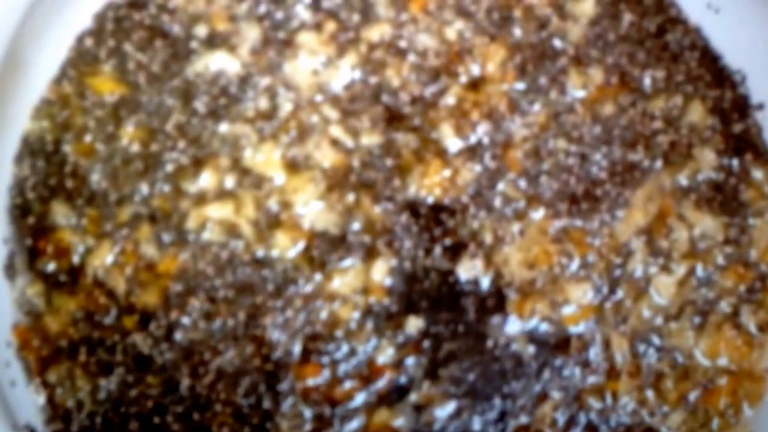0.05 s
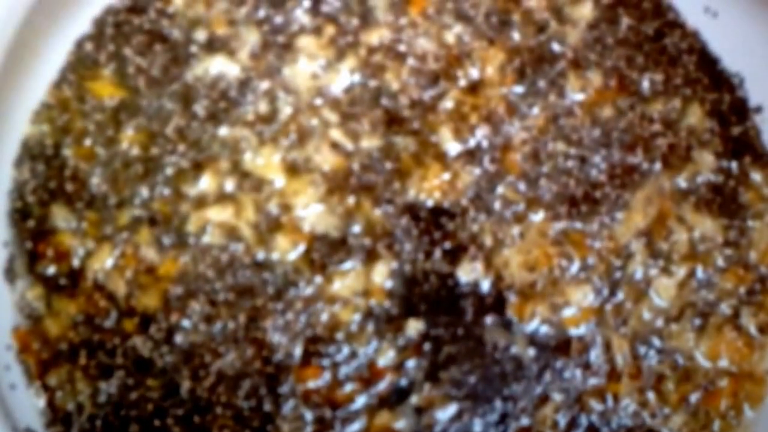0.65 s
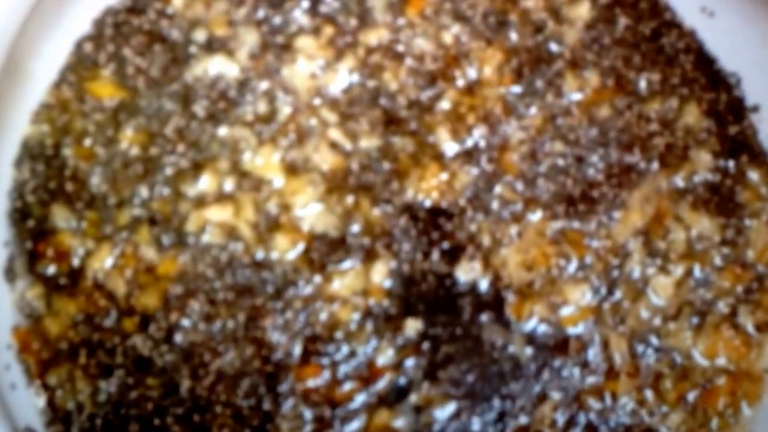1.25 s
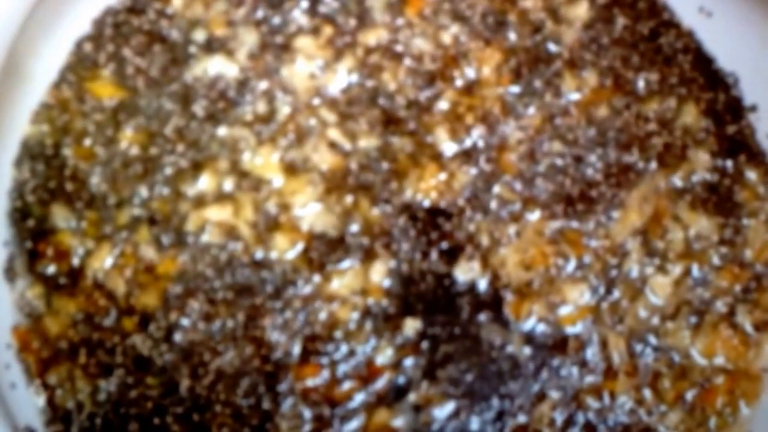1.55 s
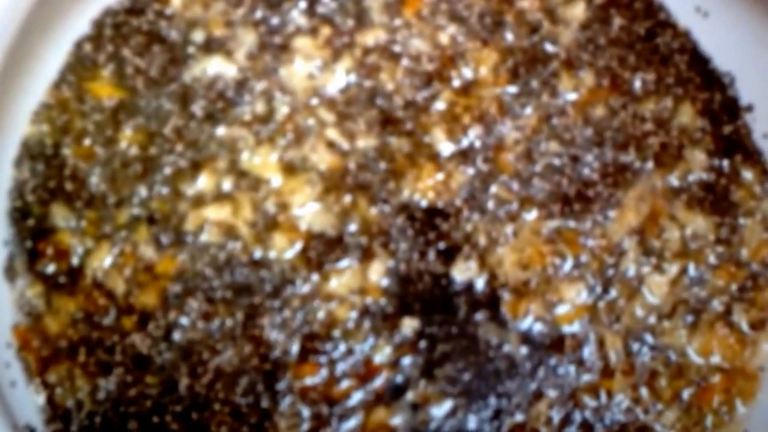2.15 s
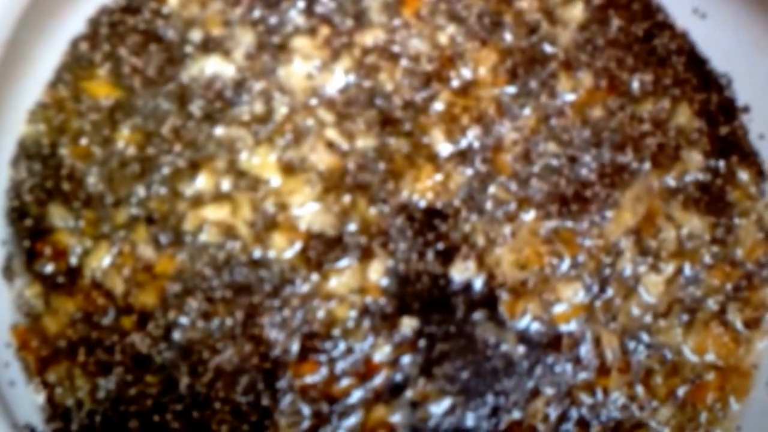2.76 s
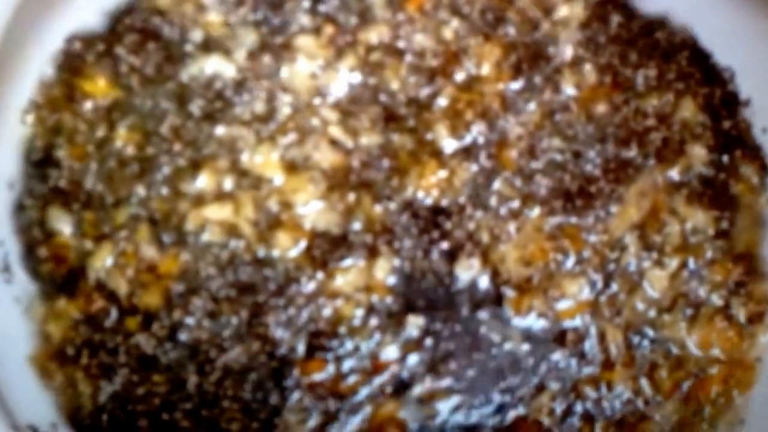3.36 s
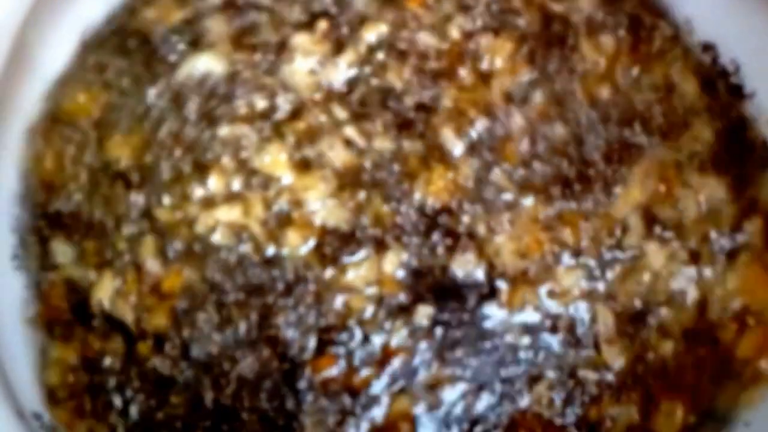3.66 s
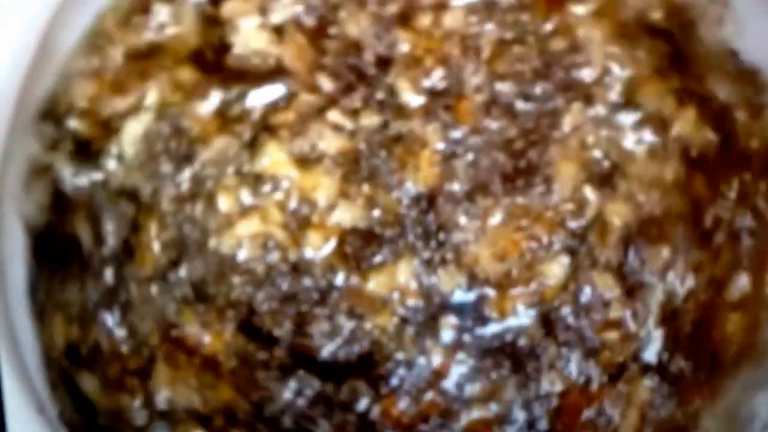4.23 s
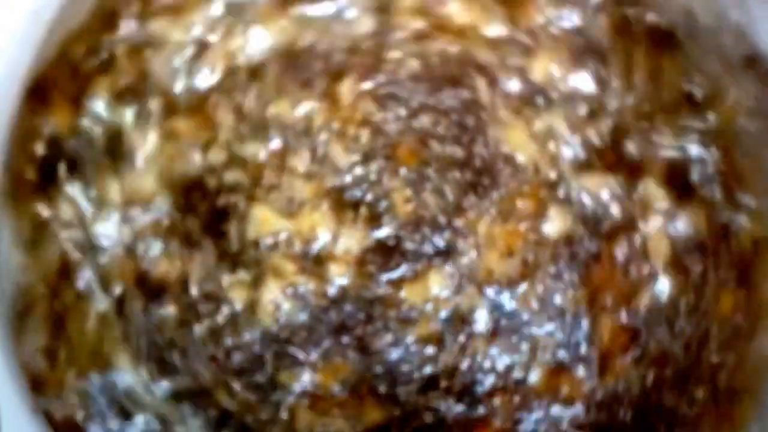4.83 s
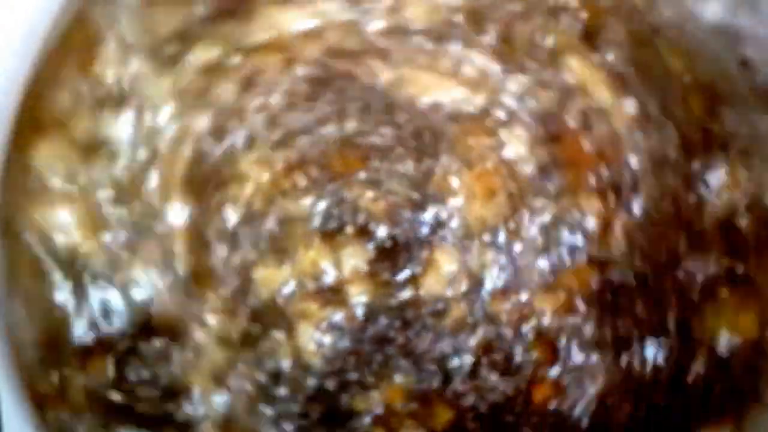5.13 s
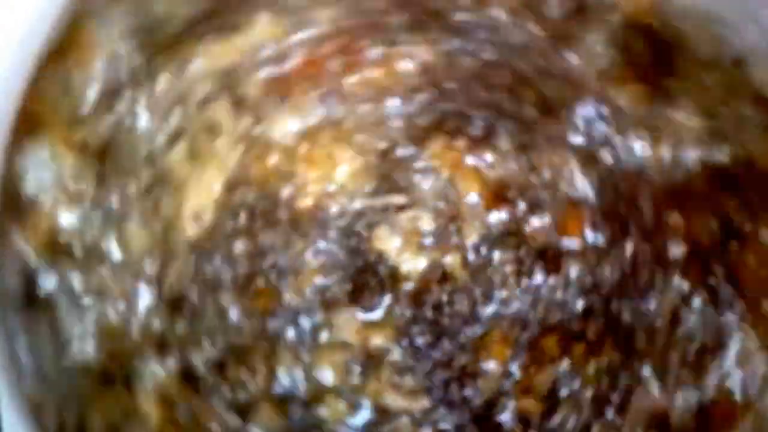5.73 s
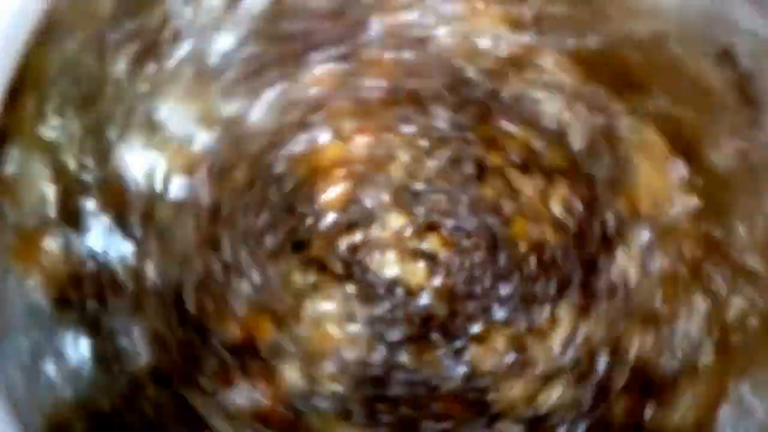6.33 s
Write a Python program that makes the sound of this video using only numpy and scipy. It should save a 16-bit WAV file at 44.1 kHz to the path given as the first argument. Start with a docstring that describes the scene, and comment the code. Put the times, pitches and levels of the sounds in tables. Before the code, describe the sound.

A toilet lever rattles over a faint hiss, then the flush rushes in with fizzing spray, spurts, squelches and gurgling.

```python
"""A toilet flushing, full of food scraps: small tiled bathroom, one microphone just above the bowl.
The jet spits air, catches and rushes in as fine drops and fizz. Air trapped under the swirling scraps
escapes in spurts and sagging squelches; the water slops and gurgles below, and the flow blows hollow
notes from the pipes. Before the water comes, the lever rattles and knocks over a faint hiss and hum."""
import sys
import numpy as np
from scipy import signal
from scipy.fft import rfft, irfft, next_fast_len
from scipy.io import wavfile

SR = 44100
rng = np.random.default_rng(int(sys.argv[2]) if len(sys.argv) > 2 else 0)


def master(y):
    """Save y as 16-bit WAV."""
    cut = np.clip(np.atleast_2d(y).T, -1, 1)
    pcm = np.round(cut * 32767)  # scale
    wavfile.write(sys.argv[1], SR, pcm.astype(np.int16))


N = 286120
TIME = np.arange(N) / SR
FREQS = np.fft.rfftfreq(N, 1 / SR)

# The jet just below the microphone, still spitting air: time_s, level_db
JET_SPITTING = [(2.52, -59), (2.55, -45.5), (2.594, -44.5), (2.648, -27.5), (2.858, -35), (2.862, -29),
                (2.96, -41.5), (3.15, -39.5)]
# The jet once it runs full: time_s, level_db
JET_RUSHING = [(3.3, -23.5), (3.34, -24.5), (3.87, -24.5), (4.0, -26), (4.58, -30.5), (4.79, -31),
               (5.83, -30), (6.17, -26), (6.48, -28)]
# Tone of the spray at close range: frequency_hz, level_db
SPRAY_SPECTRUM = [(100, -75), (1200, -27), (2600, -12.5), (3800, -1.5), (5600, -3), (7000, 1), (10300, 2),
                  (11300, 0.5), (12000, -17), (13000, -12.5), (15000, -27)]
def jet_spray(catch_s=3.154):
    """The jet breaks into fine drops and fizz; it jumps to full flow as it catches."""
    patter = drops(per_s=5000, spread_db=0)
    fizz = amp(-6) * bubbles(2953, 11750, per_s=2200, cycles=11.3, spread_db=-0.5)
    flow_db = np.where(TIME < catch_s, follow(JET_SPITTING), follow(JET_RUSHING))
    spray = colour(patter + fizz, SPRAY_SPECTRUM)
    return amp(flow_db + 9) * spray * surges(per_s=51, fall_s=0.011, depth=0.51)


# Water churning as the bowl fills: time_s, level_db
CHURN_FILLING = [(2.52, -91), (2.578, -53.5), (2.724, -39), (3.15, -40)]
# Water churning as it swirls and drains: time_s, level_db
CHURN_SWIRLING = [(3.16, -31.5), (3.37, -38), (3.95, -36.5), (4.42, -42), (4.86, -44.5), (5.17, -41),
                  (6.28, -37.5), (6.48, -37.5)]
# Waves slopping over in the bowl: start_s, length_s, splash_db, gurgle_db
WAVES = [(2.687, 0.042, -21, -53), (2.756, 0.1, -33, -35.5), (2.892, 0.15, -37, -34),
         (3.161, 0.074, -23.5, -34.5), (3.202, 0.053, -17, -41), (3.313, 0.12, -17.5, -37),
         (3.487, 0.1, -19.5, -46), (3.571, 0.13, -23, -36), (3.714, 0.11, -39, -41),
         (3.853, .05, -29, -33.5), (3.93, 0.086, -30, -34), (4.281, 0.055, -36, -35.5),
         (5.058, 0.11, -38, -39.5)]
def churn(steady_db, wave_column):
    """Gain of the moving water: steady churning plus one column of the slopping waves."""
    power = amp(follow(CHURN_FILLING + CHURN_SWIRLING) + steady_db) ** 2
    for wave in WAVES:
        start, length = wave[:2]
        power += (amp(wave[wave_column]) * swell(TIME - start, length, rise_s=0.016, fall_s=0.028)) ** 2
    return np.sqrt(power)


# Tone of the splashes, from above the water: frequency_hz, level_db
SPLASH_SPECTRUM = [(100, -61), (700, -19), (1300, -16), (1700, -6.5), (2300, 0), (3200, -3), (4500, 0),
                   (7000, -7.5), (12000, -35)]
def splash():
    """Water slaps the scraps and the wall of the bowl."""
    slaps = drops(per_s=2500, spread_db=2)
    froth = amp(-6) * bubbles(1192, 5870, per_s=900, cycles=11.4, spread_db=3.5)
    return churn(steady_db=12.5, wave_column=2) * colour(slaps + froth, SPLASH_SPECTRUM)


# Tone of the gurgle down in the bowl: frequency_hz, level_db
GURGLE_SPECTRUM = [(60, -52), (150, -21), (230, -15), (350, -9), (520, 0.5), (720, 3), (900, 1),
                   (1200, -15.5), (1800, -14), (4000, -55)]
def gurgle():
    """Large bubbles churn in the water."""
    glugs = bubbles(225.7, 1410, per_s=800, cycles=8.2, spread_db=0)
    wash = amp(1.5) * rng.standard_normal(N)
    return churn(steady_db=-2, wave_column=3) * colour(glugs + wash, GURGLE_SPECTRUM)


# Air pockets squeezed from under the scraps, close up: start_s, length_s, pitch_hz, level_db
AIR_POCKETS = [(3.18, 0.16, 4430, -18.5), (3.336, .09, 3800, -16.5), (3.42, 0.063, 3500, -13),
               (3.581, .12, 2960, -20), (3.929, 0.15, 8970, -16.5), (4.097, 0.096, 4870, -17),
               (4.191, .095, 5100, -15.5), (4.297, .06, 4150, -20.5), (4.577, 0.089, 4220, -17),
               (4.645, 0.078, 3730, -19.5), (4.875, .18, 3840, -16), (5.016, 0.069, 7750, -20),
               (5.096, .11, 8000, -21), (5.182, 0.21, 4060, -20), (5.326, 0.06, 6800, -19.5),
               (5.363, 0.12, 4200, -18), (5.461, 0.1, 3700, -17), (5.574, 0.21, 3650, -18),
               (5.772, 0.2, 3930, -20), (6.057, 0.14, 7100, -19.5), (6.185, 0.096, 4600, -19.5)]
def squelches(sag_octaves=0.18):
    """Spray rings each air pocket, whose pitch sags as it opens."""
    out = np.zeros(N)
    for start, length, hz, db in AIR_POCKETS:
        t = np.arange(0, length, 1 / SR)
        pitch = hz * 2 ** (sag_octaves * (.5 - t / length))
        ring = resonate(drops(per_s=2500, spread_db=-1)[:len(t)], pitch, width_hz=2400)
        sputter = unit(ring * surges(per_s=59, fall_s=0.018, depth=0.76)[:len(t)])
        add(out, start, amp(db) * sputter * swell(t, length, rise_s=0.014, fall_s=0.03))
    return signal.sosfilt(signal.butter(4, 2100, "high", fs=SR, output="sos"), out)


# Bursts of air and water, close up: start_s, length_s, pitch_hz, width_hz, level_db
AIR_BURSTS = [(2.686, 0.029, 3560, 1500, -22.5), (2.701, 0.039, 2220, 596, -25.5),
              (2.763, 0.07, 1300, 400, -35.5), (2.821, 0.025, 4400, 1500, -18.5),
              (2.858, .021, 7860, 1200, -23), (2.863, 0.022, 5180, 1110, -9.5),
              (2.876, 0.019, 2580, 650, -16.5), (2.882, 0.026, 3260, 900, -17.5),
              (2.904, 0.017, 6400, 1400, -20), (3.003, 0.018, 3830, 300, -18.5),
              (3.044, 0.015, 2360, 350, -26.5), (3.052, .01, 7700, 1100, -24),
              (3.064, 0.0032, 4480, 550, -9), (3.071, 0.028, 4380, 350, -21),
              (3.16, 0.005, 8900, 1600, -13), (3.213, 0.032, 3000, 700, -18.5),
              (3.256, 0.02, 8050, 1800, -16), (3.272, 0.026, 4530, 1200, -17.5),
              (3.393, 0.019, 4150, 1000, -13.5), (3.519, 0.015, 3820, 700, -18.5),
              (3.63, 0.023, 8200, 3000, -16.5), (3.75, 0.0078, 4240, 1000, -14.5),
              (3.784, 0.014, 2760, 1000, -23.5), (3.842, 0.011, 4500, 1300, -18.5),
              (3.874, .018, 3530, 1170, -14.5), (4.069, 0.014, 7700, 2030, -9),
              (4.174, 0.021, 8400, 3000, -11.5), (4.232, 0.039, 6650, 2220, -14.5),
              (4.335, 0.026, 7350, 2600, -12.5), (4.482, 0.021, 7550, 2200, -14),
              (5.149, 0.032, 7300, 2580, -12.5), (5.274, 0.021, 4460, 1400, -13.5),
              (5.31, .008, 3870, 600, -15), (5.795, 0.007, 5330, 550, -13.5),
              (5.936, 0.014, 6800, 1600, -16.5), (6.022, .009, 7160, 900, -15.5),
              (6.307, 0.031, 7950, 3050, -16.5), (6.468, .02, 7350, 1780, -14)]
def spurts(rise_s=0.00051, drain_s=0.011):
    """Each burst of air rings its own cavity, starts sharply and drains away."""
    out, t = np.zeros(N), np.arange(SR // 8) / SR
    for start, length, hz, width_hz, db in AIR_BURSTS:
        ring = resonate(rng.standard_normal(len(t)), hz, width_hz)
        decay = np.exp(-.5 * t / length - np.maximum(t - length, 0) / drain_s)
        burst = ring * (1 - np.exp(-t / rise_s)) * decay
        add(out, start, amp(db) * burst / np.std(burst[t < length]))
    return signal.sosfilt(signal.butter(2, [900, 11000], "band", fs=SR, output="sos"), out)


# Cavities singing in the pipes and the whirl: start_s, end_s, pitch_hz, width_hz, level_db
CAVITY_NOTES = [(2.582, 2.863, 572, 17, -43.5), (2.57, 2.7, 1750, 71, -54), (3.6, 4.28, 577, 13, -48.5),
                (3.8, 4.25, 1095, 100, -51.5), (4.953, 5.345, 330, 21, -62.5),
                (5.783, 6.454, 322, 13, -57.5), (5.225, 5.97, 3680, 92, -28), (5.92, 6.3, 6990, 350, -33)]
def cavities():
    """The flow blows fluttering hollow notes from the pipes and thin ones from gaps in the whirl."""
    out = np.zeros(N)
    flutter = surges(per_s=42, fall_s=0.0092, depth=0.88)
    for start, end, hz, width_hz, db in CAVITY_NOTES:
        count = round((end - start) * SR)
        note = resonate(rng.standard_normal(count + SR), hz, width_hz)[-count:]
        add(out, start, amp(db) * unit(note) * signal.windows.tukey(count, .15))
    return signal.sosfilt(signal.butter(2, 150, "high", fs=SR, output="sos"), out * flutter)


# The lever rattling nearby: start_s, scrape_db, scrape_t60_s, tilt_db_per_octave, ring_db
LEVER_KNOCKS = [(.002, -40.5, 0.2, -1, -58), (0.225, -39, 0.087, -1, -57), (0.545, -35, 0.29, 0, -46),
                (0.599, -35.5, 0.22, 1.5, -47), (.86, -39, 0.38, 7, -55), (0.937, -37.5, 0.18, -2, -44.5),
                (1.021, -37.5, 0.16, -2, -43), (1.51, -42.5, 1, 16, -75), (1.659, -34.5, 0.47, 9, -68),
                (1.901, -40, 0.24, 2, -48), (2.009, -31, 0.12, -0.5, -61), (2.078, -37.5, 0.12, 3, -63),
                (2.168, -33, 0.14, 0.5, -25), (2.226, -34, 0.12, 3.5, -60)]
# Ring of the knocked lever: pitch_hz, level_db, t60_s
LEVER_RING = [(768, -9.5, 0.2), (842, -6, 0.12), (927, -15, 0.19), (1604, -6.5, 0.11), (1790, -9, 0.11),
              (1916, -11, 0.1), (2008, -7.5, 0.2), (2250, -8, 0.15), (2350, 1.5, 0.047), (3080, -18, 0.11)]
# Tone of its scrape: frequency_hz, level_db
SCRAPE_SPECTRUM = [(400, -22), (750, -3.5), (1300, -15.5), (2200, -18), (3000, -3.5), (4100, 3),
                   (6000, -3.5), (8500, -3), (11000, -8), (13000, -30), (15000, -32)]
def lever():
    """The lever clicks and scrapes; the harder knocks chatter and ring."""
    out, t = np.zeros(N), np.arange(SR // 2) / SR
    for start, scrape_db, t60, tilt_db, ring_db in LEVER_KNOCKS:
        spectrum = [(hz, db + tilt_db * np.log2(hz)) for hz, db in SCRAPE_SPECTRUM]
        grit = colour(drops(per_s=6800, spread_db=1)[:len(t)], spectrum)
        onset = 1 - np.exp(-t / (0.0043 * t60))  # long scrapes start softly
        scrape = grit * onset * amp(scrape_db - 60 * t / t60)
        ring = sum(amp(db - 60 * t / ring_t60) * np.sin(2 * np.pi * (hz * t + rng.random()))
                   for hz, db, ring_t60 in LEVER_RING)
        chatter = resonate(rng.standard_normal(len(t)), 1920, width_hz=710) * amp(-4.5 - 60 * t / 0.18)
        knock = amp(ring_db) * (ring + chatter) * (1 - np.exp(-t / 0.00074))
        add(out, start, scrape + knock)
    return out


# Peaks and hollows of the porcelain bowl, from just above it: frequency_hz, half_width_hz, gain_db
BOWL_RESONANCES = [(215, 15, -6.3), (323, 15, 2.4), (366, 15, -3.0), (560, 25, 4.9), (732, 15, 3.0),
                   (818, 65, 3.0), (947, 15, -3.4), (991, 25, -7.1), (1098, 25, 6.2), (1270, 65, -5.7),
                   (1486, 15, -3.2), (1744, 65, 4.5), (1960, 65, -4.6), (2185, 45, 4.5), (2606, 40, -5.6),
                   (3488, 40, -3.2), (3682, 60, 3.0), (4005, 65, 3.1), (4242, 40, -3.3), (4479, 65, 2.9),
                   (4931, 65, -4.3), (6072, 100, -4.2), (6977, 100, 5.2), (7278, 65, -2.7),
                   (8355, 100, 3.7), (10960, 65, -7.0), (11499, 65, -4.1)]
def bowl(x):
    """The bowl's standing waves colour the water and ring on after it."""
    db = sum(gain * np.exp(-.5 * ((FREQS - hz) / width) ** 2) for hz, width, gain in BOWL_RESONANCES)
    log_gain = np.log(amp(np.r_[db, db[-2:0:-1]]))
    response = np.fft.ifft(np.exp(np.conj(signal.hilbert(log_gain)))).real  # minimum phase
    return signal.oaconvolve(x, response[:SR // 10])[:N]


def bathroom(x, t60_s, wet_db):
    """Dense reflections reach the microphone from close tiled walls."""
    t = np.arange(SR // 2) / SR
    echoes = rng.choice([-1, 1], len(t)) * (rng.random(len(t)) < 3000 / SR) * (t > .003)
    tail = echoes * amp(-60 * t / t60_s)
    return x + amp(wet_db) * signal.oaconvolve(x, tail / np.linalg.norm(tail))[:N]


# The water supply, faint in the background: time_s, level_db
SUPPLY_LEVEL = [(0, -45), (.4, -49), (.8, -45.5), (1.2, -47), (1.45, -48), (1.55, -47), (1.8, -44),
                (2.02, -43.5), (2.16, -39), (2.28, -46), (2.5, -46.5)]
# Tone of its hiss: frequency_hz, level_db
SUPPLY_SPECTRUM = [(200, -15), (450, -1.5), (720, -0.5), (1200, -12), (2100, 4), (3800, 6), (5500, 6.5),
                   (8000, 2.5), (11200, -1), (12000, -12), (15000, -14)]
def supply_hiss():
    """The water supply hisses softly, swelling briefly before the flush."""
    return amp(follow(SUPPLY_LEVEL)) * colour(rng.standard_normal(N), SUPPLY_SPECTRUM)


# Electric hum in the bathroom: pitch_hz, level_db
HUM_PARTIALS = [(118.4, -77), (236.9, -70.5)]
# Low noise of the room: frequency_hz, level_db
RUMBLE_SPECTRUM = [(10, -42), (25, -20), (40, -9), (62, -4.5), (100, -7), (180, -5), (300, -15),
                   (600, -9.5), (1500, -15), (5000, -55)]
def room_tone(hum_rise_s=0.62):
    """An electric hum fades in over low room noise, with a soft bump at the start."""
    hum = sum(amp(db) * np.sqrt(2) * np.sin(2 * np.pi * hz * TIME + 0.48 * wander(rate_hz=5.2))
              for hz, db in HUM_PARTIALS)
    hum *= np.minimum(TIME / hum_rise_s, 1)
    boom = resonate(rng.standard_normal(N), 85, width_hz=69)
    bump = amp(-64.5) * boom * np.exp(-((TIME - .14) / 0.12) ** 2)
    return hum + bump + amp(-68) * colour(rng.standard_normal(N), RUMBLE_SPECTRUM)


def drops(per_s, spread_db):
    """Random impacts whose sizes scatter by spread_db."""
    sizes = amp(spread_db * np.minimum(rng.exponential(1, N), 4))
    return unit(sizes * rng.choice([-1, 1], N) * (rng.random(N) < per_s / SR))


def bubbles(low_hz, high_hz, per_s, cycles, spread_db, count=24):
    """Bubbles of many sizes ring for a few cycles, rising slightly in pitch."""
    out = np.zeros(N)
    for hz in np.geomspace(low_hz, high_hz, count):
        turns = np.arange(int(4 * cycles * SR / hz)) * hz / SR
        ring = np.exp(-turns / cycles) * np.sin(2 * np.pi * turns * (1 + 0.019 * turns / cycles))
        out += np.sqrt(hz) * unit(signal.oaconvolve(drops(per_s / count, spread_db), ring)[:N])
    return unit(out)


def surges(per_s, fall_s, depth):
    """Gain of a sputtering flow: each slug of water hits at once and dies away."""
    slugs = rng.exponential(1, N) * (rng.random(N) < per_s / SR)
    power = signal.lfilter([1], [1, -np.exp(-1 / (fall_s * SR))], slugs)
    return unit(np.sqrt(1 + depth * power))


def resonate(x, hz, width_hz):
    """A steep resonance that follows hz."""
    turn = np.exp(2j * np.pi * np.cumsum(hz * np.ones(len(x))) / SR)
    r = np.exp(-np.pi * width_hz / SR)
    return unit((turn * signal.lfilter([(1 - r) ** 2], [1, -2 * r, r * r], x / turn)).real)


def colour(x, spectrum):
    """Filters x by a spectrum, at rms 1."""
    hz, db = np.transpose(spectrum)
    size = next_fast_len(len(x))
    gain = amp(np.interp(np.log(np.fft.rfftfreq(size, 1 / SR) + 1), np.log(hz), db))
    return unit(irfft(rfft(x, size) * gain, size)[:len(x)])


def wander(rate_hz):
    """Smooth random drift, rms 1."""
    return unit(irfft(rfft(rng.standard_normal(N)) * np.exp(-(FREQS / rate_hz) ** 2), N))


def swell(t, length, rise_s, fall_s):
    """Attack, hold and release within length."""
    return np.clip(np.minimum(t / rise_s, (length - t) / fall_s), 0, 1)


def follow(curve):
    """A curve's value at every sample."""
    return np.interp(TIME, *np.transpose(curve))


def add(mix, start_s, sound):
    """Mixes a sound in at start_s."""
    part = mix[round(start_s * SR):][:len(sound)]
    part += sound[:len(part)]


def amp(db):
    """Decibels to gain."""
    return 10 ** (np.asarray(db) / 20)


def unit(x):
    """Scales to rms 1."""
    return x / np.sqrt(np.mean(x ** 2) + 1e-20)


def scene():
    """One microphone just above the bowl, the same in both channels."""
    hiss, room = supply_hiss(), room_tone()
    water = bowl(jet_spray() + splash() + gurgle() + squelches() + spurts() + hiss)
    mono = amp(-5) * bathroom(water + lever(), t60_s=0.1, wet_db=-7.5) + cavities() + room
    return np.array([mono, mono])


def record(dry):
    """The recorder cuts off the highest treble."""
    lowpass = signal.firwin(511, 15350, window=("kaiser", 9), fs=SR)
    return signal.oaconvolve(dry, lowpass[None], "same")


dry = scene()
out = record(dry)
master(out)
```